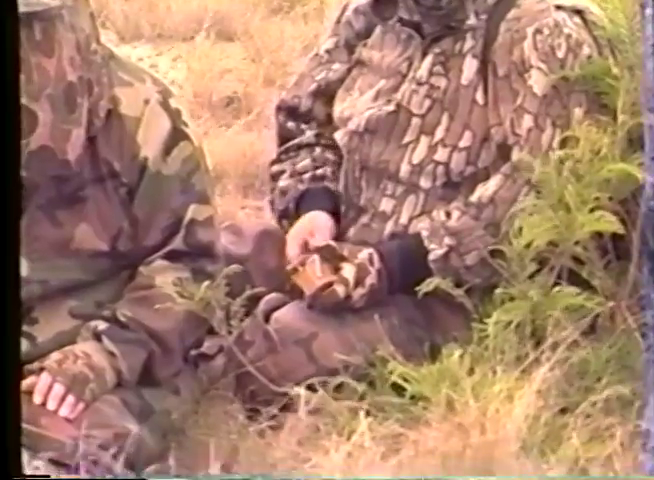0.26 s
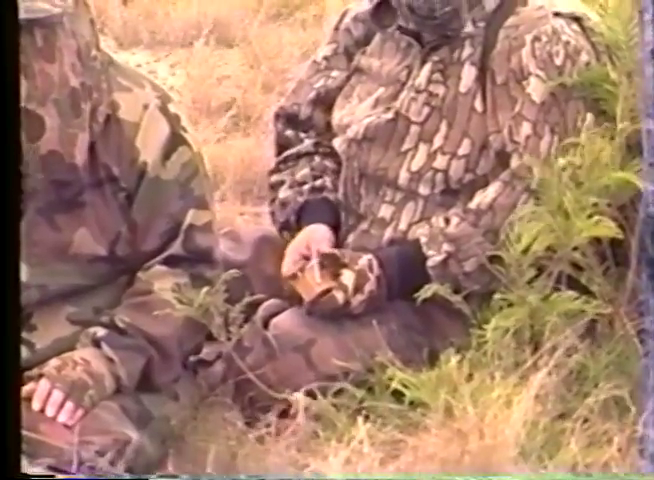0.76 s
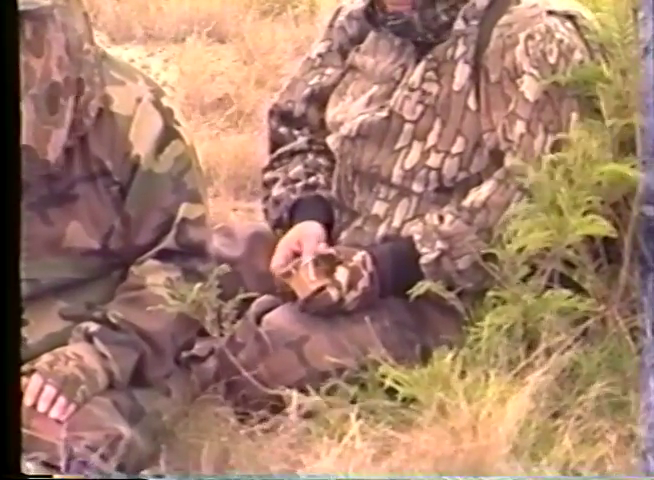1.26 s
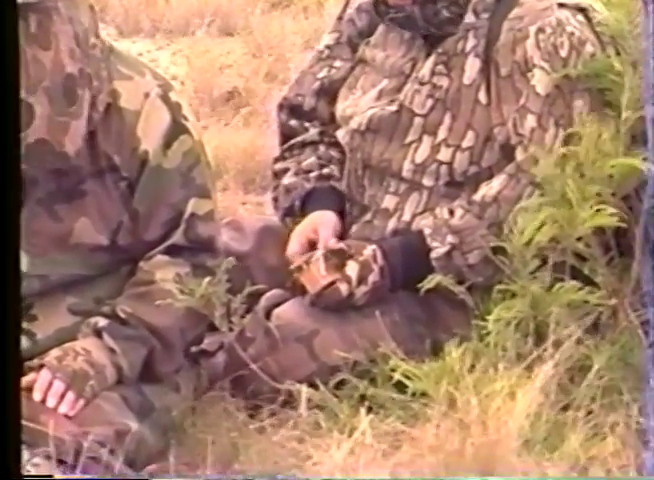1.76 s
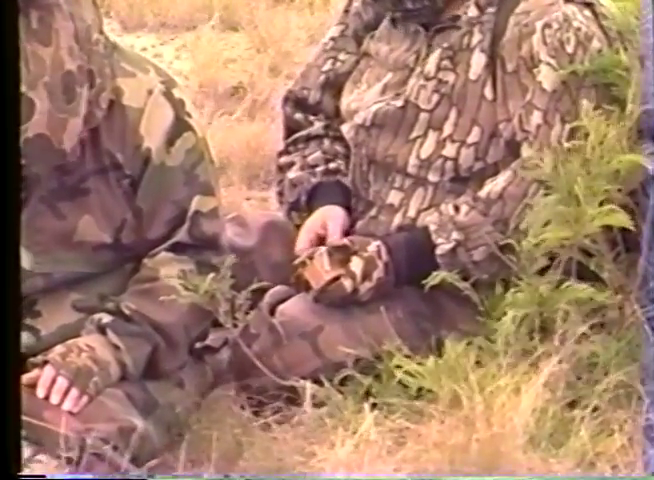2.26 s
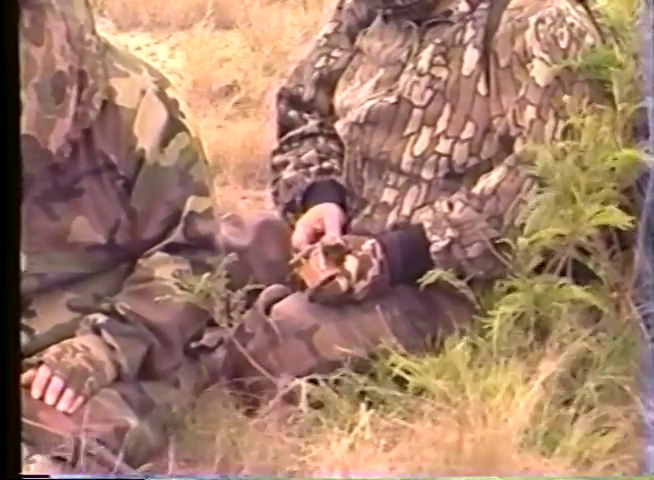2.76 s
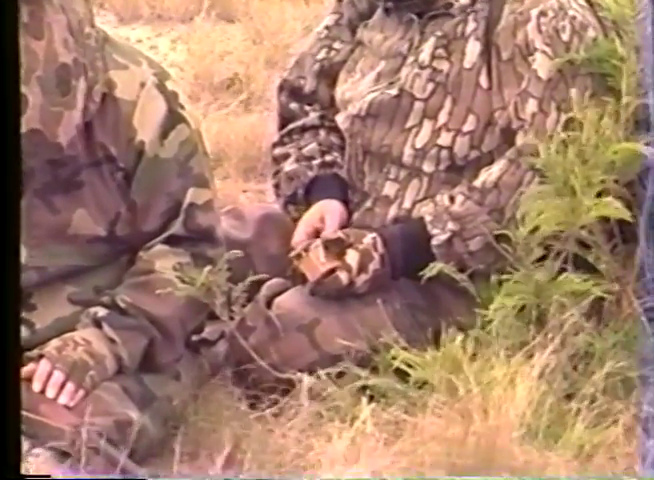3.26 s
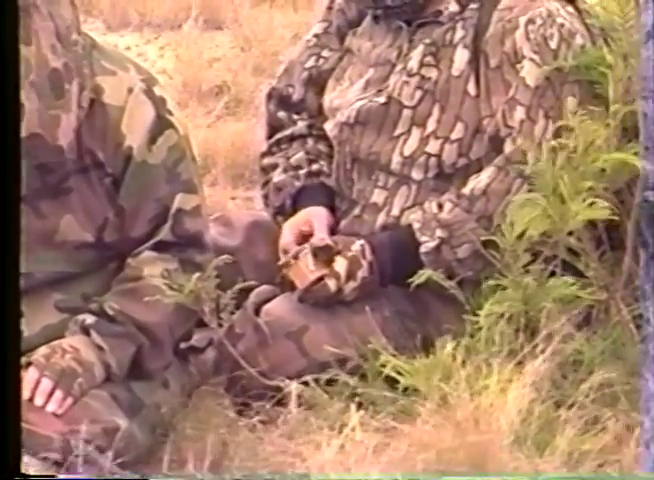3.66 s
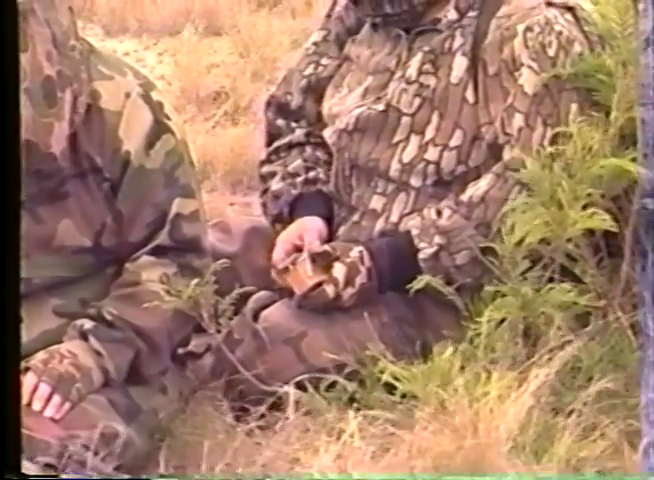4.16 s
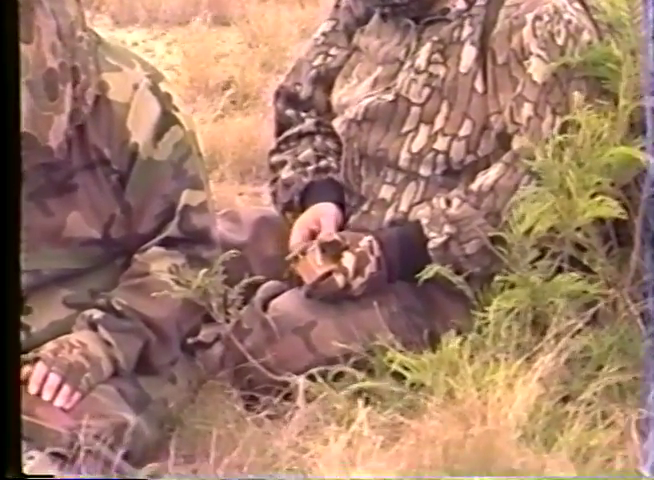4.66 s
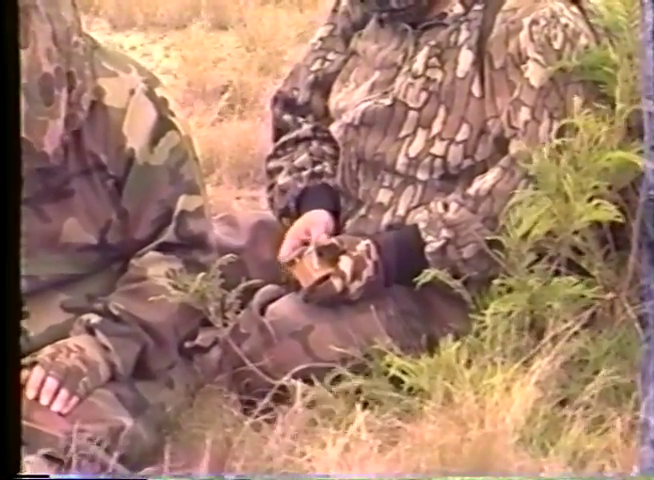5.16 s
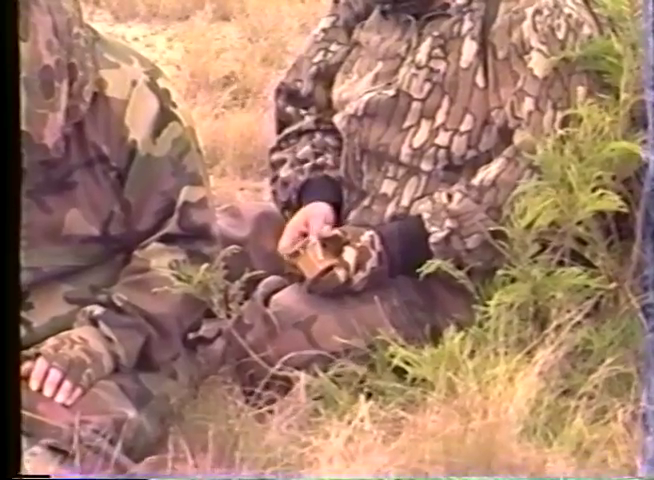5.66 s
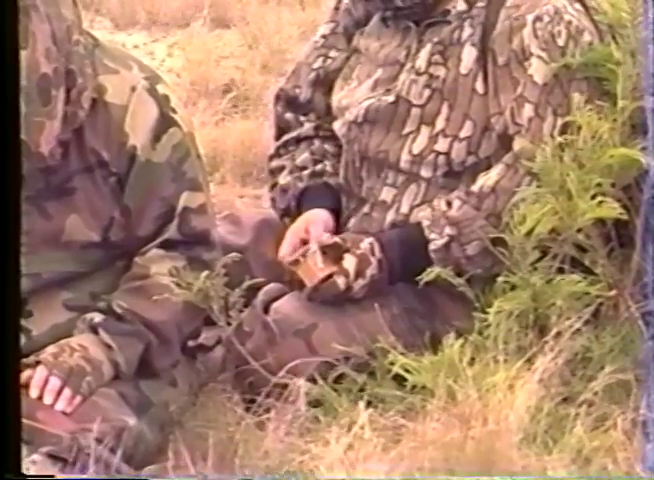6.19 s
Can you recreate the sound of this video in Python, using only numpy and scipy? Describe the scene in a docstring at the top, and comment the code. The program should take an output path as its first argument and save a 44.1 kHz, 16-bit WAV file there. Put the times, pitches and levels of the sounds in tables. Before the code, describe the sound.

A wooden turkey call squeaks out a quick series of scratchy yelps at close range, its lid rattling lightly between strokes. It pauses, gives two separate knocking clucks, then draws one slow, wavering squeal and starts a second run of yelps. Behind it is quiet outdoor air: soft wind in the grass and on the microphone, a faint steady hum and a few tiny, far-off bird chirps.

```python
"""Turkey box call in open grassland

Close to the microphone, a hand works a wooden box call: two runs of yelps with two clucks between.
The chalked lid sticks and slips on the box, falls in pitch, chatters as it leaves the edge and scuffs
on its way back. Small birds sing far off and a breeze buffets the microphone. The camcorder's gain
control ducks the breeze after each loud stroke, over a faint hum."""
import sys
import numpy as np
from scipy import signal
from scipy.fft import rfft, irfft
from scipy.io import wavfile
from scipy.ndimage import uniform_filter1d

SR = 44100
rng = np.random.default_rng(int(sys.argv[2]) if len(sys.argv) > 2 else 0)


def transcribe(u):
    """Save the signal u as a 16-bit wav file named by the first command-line argument.

    u: samples, shape (n,) or (channels, n), limited to [-1, 1]; the rate is SR.
    q: integer samples, one column per channel.
    """
    v = np.clip(np.atleast_2d(u).T, -1, 1)
    q = np.round(v * 32767).astype(np.int16)
    wavfile.write(sys.argv[1], SR, q)


N = 283559

# resonances of the box: (frequency [Hz], width [Hz], level [dB])
BOX = [(650.5, 65, -3.5), (878, 95, 3), (1379, 288, 3), (1517, 185, -1.5), (1851, 246, -4.5),
       (2163, 455, -4), (2544, 490, -21.5), (3670, 504, -12), (4020, 480, -3.5), (5680, 580, -13.5),
       (6220, 250, -17), (7253, 284, -17), (8620, 730, -22.5), (10600, 2500, -36)]
# resonances of the lid riding loose: (frequency [Hz], width [Hz], level [dB])
LID = [(1330, 300, -1.5), (2640, 780, -3), (3930, 600, -2.5), (5570, 320, 0.5), (6080, 300, 1.5),
       (7260, 200, -6), (8600, 1250, -2.5)]


def box_call(mix):
    """The lid is drawn over the edge stroke by stroke, and chatters each time it leaves."""
    # quick strokes, the two shortest being clucks: (start [s], length [s], level [dB], swell [s],
    # sag [dB], top pitch [Hz], time to top [s], glide [s], opening scratch [s], release [s],
    # chatter length [s], chatter level [dB])
    strokes = [(0.48, 0.11, -4, 0.011, 10, 874, 0.0079, 0.063, 0.0023, 0.029, 0.015, -21.5),
               (0.787, 0.086, -4.5, 0.012, 6.5, 827, 0.023, 0.031, 0.0025, 0.0054, 0.024, -10),
               (1.058, 0.087, -4.5, 0.016, 4, 827, 0.028, 0.034, 0.0054, 0.0071, 0.032, -9),
               (1.324, 0.08, -3, 0.024, 3.5, 824, 0.033, 0.031, 0.012, 0.0046, 0.025, -8),
               (1.615, 0.05, -5.5, 0.011, 4, 807.6, 0.011, 0.023, 0.0048, 0.0061, 0.036, -10.5),
               (1.872, 0.066, -5, 0.0055, 3, 820, 0.011, 0.033, 0.0042, 0.0021, 0.04, -9.5),
               (2.685, 0.017, 2.5, 0.00079, 2.5, 734, 0.0058, 0.0086, 0.0082, 0.0058, 0.024, -2),
               (3.4981, 0.017, -3, 0.0025, 0.5, 770, 0.0016, 0.012, 0.015, 0.0043, 0.014, -4),
               (4.607, 0.099, -7.5, 0.023, 3, 749, 0.0053, 0.063, 0.0048, 0.034, 0.043, -28.5),
               (4.894, 0.1, -8.5, 0.012, 2.5, 757, 0.0051, 0.055, 0.0034, 0.02, 0.028, -20.5),
               (5.179, 0.069, -6, 0.0066, 3, 810, .019, 0.032, 0.0083, 0.0087, 0.026, -12),
               (5.472, 0.059, -5, 0.0029, 3.5, 807, 0.015, 0.028, 0.0066, 0.0089, 0.028, -12),
               (5.726, 0.07, -5, 0.012, 2.5, 813.5, 0.022, 0.029, 0.0066, 0.0045, 0.03, -8.5),
               (6.001, 0.061, -5.5, 0.0045, 3.5, 768, 0.0032, 0.035, 0.0038, 0.0031, 0.02, -5.5),
               (6.261, 0.068, -6, 0.026, 5.5, 776, 0.021, 0.031, 0.012, 0.0046, 0.022, -9)]
    # chatter that ends the slow stroke: (time [s], length [s], level [dB])
    closing_chatter = (4.336, .04, -15.5)
    ring = wood_ring(BOX, -0.34, 480)
    for row in strokes:
        start, length, db, swell_s, sag_db, top_hz, top_s, glide_s = row[:8]
        bite_s, release_s, chatter_s, chatter_db = row[8:]
        gesture = quick_stroke(start, length, db, swell_s, sag_db, top_hz, top_s, glide_s, release_s)
        tilt_db = -2.17 * np.log2(glide_s / 0.03)  # slower glides are duller
        add(mix, start, yelp(*gesture, bite_s, tilt_db))
        add(mix, *chatter(start + length, chatter_s, chatter_db, ring))
    add(mix, *slow_stroke())
    add(mix, *chatter(*closing_chatter, ring))


def yelp(hz, force, bright_db, skid, bite_s, tilt_db, jitter=0.017, rasp_rad=0.32, chalk_db=-18.5):
    """Stick and slip on the edge; every cycle holds two unequal slips, so even partials lead."""
    n = len(hz)
    bite = np.exp(-(np.arange(n) / SR / bite_s) ** 2)
    turns = np.cumsum(hz * (1 + (jitter * np.sqrt(force) + 0.048 * bite) * wobble(n, 540))) / SR
    odd_db = -7 * (1 - force) - 7 * (hz / 880) ** 12  # soft or high, the two slips grow alike
    tone = 0
    for k in range(1, 21):
        octaves = np.log2(np.clip(k, 2, 10) / 2)
        flutter_db = 3 * np.sqrt(k / 6) * wobble(n, 100)
        waver = rasp_rad * octaves / 2 * wobble(n, 220)
        gain = amp(odd_db * (k % 2) + flutter_db + bright_db * octaves)
        tone = tone + gain * np.cos(2 * np.pi * k * turns + waver)
    # before it sings the lid catches with a dull, woody scratch
    scratch = noise(n, [(1600, 0), (7000, -15)])
    drive = unit(tone) * (1 - bite) + amp(1) * scratch * bite
    # chalk crunches in clumps and in step with the slips, more under a hard grip, less in a skid
    grit = rng.standard_normal(n) * (1 + 0.5 * np.cos(2 * np.pi * turns))
    grit = unit(grit * amp(6 * wobble(n, 260)))
    grit *= amp(chalk_db + tilt_db + 6 * skid) * force ** 0.88 * hz / 700
    sound = signal.fftconvolve(drive, wood_ring(BOX, tilt_db, 692, notch_db=-8.5))
    sound += signal.fftconvolve(grit, wood_ring(BOX, tilt_db))
    # the hand's push shakes the whole box faintly, most as the lid bites
    shake = noise(n, [(60, 2.5), (200, -7.5), (550, -16.5), (3000, -64)])
    push = amp(-27) * (0.86 + 3 * bite) * shake
    return (steady(sound[:n]) + push) * force


def quick_stroke(start, length, db, swell_s, sag_db, top_hz, top_s, glide_s, release_s, low_hz=640.6):
    """Pitch arches and falls toward the low note while the hand's pressure swells and sags."""
    age = np.arange(int((length + release_s) * SR)) / SR
    hz = low_hz + (top_hz - low_hz) * np.exp(-abs((age - top_s) / glide_s) ** 2.454)
    press_db = -31 * np.clip(1 - age / swell_s, 0, 1) ** 2 - sag_db * (age / length) ** 3.8
    bright_db = -1.28 + 0.46 * press_db  # per octave; a lighter hand is duller
    return grip(start + age, hz, db + press_db, bright_db, release_s)


def slow_stroke():
    """The long whine that opens the second run: the hand feels for the grip, then leans in."""
    # course of the stroke: (time [s], pitch [Hz], level [dB], brightness [dB/octave])
    whine = [(4.047, 739, -31, -2), (4.083, 737, -26, -7), (4.115, 784, -23, -0.5), (4.165, 803.5, -22, 2),
             (4.208, 777, -21.5, -0.5), (4.248, 737, -10, -3.5), (4.28, 734, -11, -2),
             (4.33, 658.6, -10, -5), (4.381, 643, -21, -15)]
    times, *curves = np.transpose(whine)
    t = np.arange(times[0], times[-1], 1 / SR)
    hz, db, bright_db = (np.interp(t, times, curve) for curve in curves)
    gesture = grip(t, hz, db, bright_db, release_s=0.06)
    return times[0], yelp(*gesture, bite_s=0.0024, tilt_db=-4)


def grip(t, hz, db, bright_db, release_s, lift_hz_per_db=2):
    """The lid takes hold, skids and lets go. Gives pitch, force, brightness and skidding (0 to -1, lowest in a
    skid)."""
    # brief losses of grip: (time [s], half width [s], loss [dB], bend scale [Hz])
    # a positive bend climbs into the skid and restarts low; a negative one drags, then leaps
    skids = [(0.503, 0.0084, 1.5, 47), (0.523, 0.012, 5, -1.5), (0.811, 0.0032, 7.5, -11),
             (1.333, 0.0039, 13.5, 18), (1.362, 0.0049, 5.5, -17), (4.1263, 0.0075, 14.5, 61),
             (4.142, 0.0032, 16, 51), (4.16, 0.0067, 6.5, 32), (5.186, 0.0039, 5.5, 15.5),
             (5.207, 0.0065, 4, -55), (5.492, 0.0095, 7.5, -53), (5.757, 0.0047, 3.5, -52),
             (6.27, 0.0023, 11, 34)]
    near = [((t - s) / width, loss, bend) for s, width, loss, bend in skids]
    loss_db = sum(loss * np.exp(-u ** 2) for u, loss, _ in near)
    bend_hz = sum(bend * -u * np.exp(-u ** 2) for u, _, bend in near)
    skid = np.tanh(loss_db / -3.5)
    fade = np.clip(np.minimum((t - t[0]) / 0.0032, (t[-1] - t) / release_s), 0, 1)
    pitch = hz + lift_hz_per_db * loss_db + bend_hz
    return pitch, amp(db - loss_db) * fade, bright_db + 1.5 * skid, skid


def chatter(s, length, db, ring, slip_hz=440, ring_s=0.0059):
    """Loose, uneven slips die away and shake a few modes of the box, which ring on roughly."""
    # modes that sound on through the chatter: (frequency [Hz], level [dB])
    walls = [(900, -3), (1230, -16), (2150, -16.5)]
    n = int((length + 0.056) * SR)
    t = np.arange(n) / SR
    press = np.clip(t / 0.00073, 0, 1) * np.clip(1 - t / length, 0, 1) ** 1.5
    turns = np.cumsum(slip_hz * (1 + 0.31 * wobble(n, 400))) / SR
    slips = np.diff(np.floor(turns), prepend=0) + amp(-19) * rng.standard_normal(n)
    rasp = signal.fftconvolve(slips * press, ring)[:n]
    sound = amp(-12) * rasp / np.std(rasp[:int(length * SR)])
    swell = np.clip(t / 0.0051, 0, 1) / np.sqrt(1 + np.exp(2 * (t - 0.66 * length) / ring_s))
    for hz, level in walls:
        shaken = amp(1.5 * wobble(n, 300)) * sine(hz + 55 * wobble(n, 130))
        sound += amp(level) * swell * shaken
    return s, amp(db) * sound


def cluck_jabs(mix, rise_s=0.0024, crunch_s=0.005):
    """A jab starts each cluck: the whole box knocks in the hand while chalk crunches under the lid."""
    # jabs on the lid: (time [s], level [dB])
    jabs = [(2.6855, -5.5), (3.5004, -11)]
    # modes of the box in the hand: (frequency [Hz], level [dB], time to fall 60 dB [s])
    knock_modes = [(63.3, -4, 0.108), (236, -12, 0.051), (425, -7.5, 0.034), (740, 9.5, 0.036)]
    # band where the chalk crunches most: (frequency [Hz], width [Hz], level [dB])
    crunch_band = (2900, 990, 0)
    ring = wood_ring(BOX + LID + [crunch_band], 0.55)
    t = np.arange(SR // 8) / SR
    knock = sum(amp(db - 60 * t / t60) * np.sin(2 * np.pi * hz * t) for hz, db, t60 in knock_modes)
    knock *= np.clip(t / rise_s, 0, 1)
    for s, db in jabs:
        grains = unit(signal.fftconvolve(rng.standard_normal(len(t)), ring)[:len(t)])
        crunch = grains * t / crunch_s * np.exp(1 - t / crunch_s)
        add(mix, s, amp(db) * (knock + amp(4) * crunch))


def loose_lid(mix):
    """Small handling sounds, heard at close range: the lid rattles, scuffs back and taps the box."""
    # one rattle after the first run: (time [s], length [s], level [dB])
    rattle = (2.013, 0.011, -27)
    # return swings of the lid: (time [s], length [s], level [dB])
    scuffs = [(0.211, 0.033, -39), (0.963, 0.016, -38), (1.507, 0.064, -29.5), (2.055, 0.046, -36),
              (2.23, 0.022, -41.5), (4.749, 0.054, -43.5), (5.05, 0.026, -39.5)]
    # the lid meets the box: (time [s], peak level [dB])
    taps = [(0.43, -25), (0.7648, -23), (1.9724, -20), (2.232, -22), (3.042, -31), (6.099, -21.5)]
    # a finger ticks on the lid before the first cluck: (time [s], peak level [dB])
    finger_tick = (2.6428, -28)
    box_ring, lid_ring = wood_ring(BOX, -7, 400), wood_ring(LID, 0.1, 530)
    add(mix, *chatter(*rattle, box_ring))
    for row in scuffs:
        add(mix, *scuff(*row, lid_ring))
    for row in taps:
        add(mix, *tap(*row, box_ring))
    add(mix, *tap(*finger_tick, wood_ring(LID, -2)))


def scuff(s, length, db, ring, first_hz=1520, last_hz=1290, catch_hz=125):
    """The unloaded lid drags chalk grains and half catches a hoarse, falling squeak in quick jerks."""
    n = int(length * SR)
    along = np.linspace(0, 1, n)
    catches = np.cumsum(catch_hz * (1 + 0.41 * wobble(n, 88))) / SR
    jerks = 1 + 0.36 * np.cos(2 * np.pi * catches)
    friction = rng.standard_normal(n) * amp(3 * wobble(n, 1300)) * np.sqrt(jerks)
    grains = signal.fftconvolve(friction, ring)[:n]
    pitch = (first_hz + (last_hz - first_hz) * along) * (1 + 0.036 * wobble(n, 430))
    squeak = sine(pitch) * jerks * amp(4.1 * wobble(n, 320))
    envelope = np.clip(along * length / 0.0019, 0, 1) * (1 - along ** 1.7)
    return s, amp(db) * unit((amp(-4) * unit(grains) + unit(squeak)) * envelope)


def tap(s, db, ring, damp_s=0.0045, contact_s=0.00008, bounce_s=0.0032):
    """One soft knock on wood with a small bounce, damped by the hand."""
    t = np.arange(len(ring)) / SR
    knock = signal.fftconvolve(ring * np.exp(-t / damp_s), t * np.exp(-t / contact_s))
    add(knock, bounce_s, amp(-5) * knock)
    return s, amp(db) * knock / abs(knock).max()


def wood_ring(modes, tilt_db=0, low_hz=600, notch_db=0, size=4096):
    """The wood's answer to one slip, its treble tilted by tilt_db an octave."""
    hz = abs(np.fft.fftfreq(size, 1 / SR)) + 1
    gain = sum(amp(db) / (1 + (2 * (hz - centre) / width) ** 2) for centre, width, db in modes)
    gain *= amp(notch_db * np.exp(-((hz - 2850) / 210) ** 2))  # cut by the way the lid touches
    gain *= amp(tilt_db * np.log2(np.maximum(hz / 1300, 1)))
    gain /= 1 + (low_hz / hz) ** 4  # so small a box radiates little bass
    minimum_phase = np.exp(np.conj(signal.hilbert(np.log(gain + 1e-4))))
    return np.fft.ifft(minimum_phase).real[:size // 2]


def far_birds(mix, scatter_s=0.013):
    """Thin, warbling glides, blurred by their way through the brush to the microphone."""
    # bird notes: (time [s], length [s], first pitch [Hz], last pitch [Hz])
    notes = [(1.272, 0.042, 2980, 4360), (3.297, 0.063, 2100, 2350), (4.419, 0.028, 8030, 8200),
             (4.819, 0.074, 3060, 2520), (4.844, 0.026, 7500, 8130), (5.086, 0.1, 3210, 2480),
             (5.314, 0.031, 8660, 7500), (5.383, 0.1, 2895, 2590), (5.427, 0.044, 8700, 7620),
             (5.692, 0.076, 3140, 2840), (5.915, 0.046, 6800, 5900), (6.168, 0.052, 6740, 5650)]
    for s, length, first_hz, last_hz in notes:
        n = int(length * SR)
        hz = np.geomspace(first_hz, last_hz, n) * (1 + 0.007 * wobble(n, 300))
        call = unit(sine(hz) * signal.windows.tukey(n, 0.7))
        path = rng.standard_normal(SR // 10) * np.exp(-np.arange(SR // 10) / SR / scatter_s)
        path *= amp(-6) / np.linalg.norm(path)
        path[0] = 1  # the direct sound
        db = -59 + 3.5 * np.log2(first_hz / 1000)  # higher calls are louder
        add(mix, s, amp(db) * signal.fftconvolve(call, path) / np.linalg.norm(path))


def breeze(split_hz=700):
    """Hiss in the grass, over a rumble and a buffeting of the microphone that rise with the gusts."""
    # spectrum of the breeze in the grass: (frequency [Hz], level [dB])
    spectrum = [(20, -34), (40, -14.5), (59, -10), (166, -14), (289, -11.5), (352, -15.5), (1010, -17.5),
                (1300, -22), (1670, -28), (2150, -23.5), (3850, -28.5), (8880, -26.5), (15500, -35.5)]
    # gusts in the rumble: (time [s], level [dB])
    gusts = [(0, 5.5), (1.9, -4), (2.451, 6), (2.85, 2.5), (3.297, 5), (4.0, 3), (4.6, -1), (6.401, -5)]
    air = amp(-51.5) * noise(N, spectrum)
    rumble = signal.sosfiltfilt(signal.butter(2, split_hz, fs=SR, output="sos"), air)
    gust = amp(np.interp(np.arange(N) / SR, *np.transpose(gusts)) + 2 * wobble(N, 5.5))
    buffet = amp(-58) * noise(N, [(15, -9.5), (30, -11.5), (65, 0.5), (120, -14), (600, -37)])
    hiss = (air - rumble) * amp(1.5 * wobble(N, 8.8))
    return rumble * gust + buffet * gust ** 2 + hiss


def gain_control(x, knee_db=-20, hold_s=0.1, recover_s=0.044, start_db=9, hop=32):
    """Gain that drops at once on a loud sound, holds, then creeps back; it starts out lowered."""
    level_db = 10 * np.log10(abs(uniform_filter1d(x ** 2, size=130)) + 1e-12)[::hop]
    t = np.arange(N)[::hop] / SR
    cut_db = 0.87 * np.maximum(level_db - knee_db, 0)
    memory = np.exp(-np.maximum(t[t < 1] - hold_s, 0) / recover_s)
    held_db = start_db * np.exp(-t / (2 * recover_s))
    for lag, weight in enumerate(memory):
        held_db[lag:] = np.maximum(held_db[lag:], weight * cut_db[:len(t) - lag])
    return amp(-np.interp(np.arange(N) / SR, t, held_db))


def amp(db):
    """Decibels to gain."""
    return 10 ** (np.asarray(db) / 20)


def unit(x):
    """Scales to rms 1."""
    return x / np.sqrt(np.mean(x ** 2) + 1e-20)


def add(mix, s, sound):
    """Mixes a sound in at time s."""
    part = mix[max(round(s * SR), 0):][:len(sound)]
    part += sound[:len(part)]


def sine(hz):
    """A sine that follows a pitch curve."""
    return np.sin(2 * np.pi * np.cumsum(hz) / SR)


def noise(n, points):
    """Noise of rms 1 with a spectrum of (frequency [Hz], level [dB]) points."""
    hz, db = np.transpose(points)
    shape = np.interp(np.log(np.fft.rfftfreq(n, 1 / SR) + 1), np.log(hz + 1), db)
    return unit(irfft(rfft(rng.standard_normal(n)) * amp(shape), n))


def wobble(n, hz):
    """Smooth random drift of rms about 1, rolling off above hz."""
    size = n + SR // 4
    lowpass = np.exp(-(np.fft.rfftfreq(size, 1 / SR) / hz) ** 2)
    return unit(irfft(rfft(rng.standard_normal(size)) * lowpass, size))[:n]


def steady(x, size=130):
    """Evens out the level over a few cycles."""
    return x / np.sqrt(abs(uniform_filter1d(uniform_filter1d(x ** 2, size), size)) + 1e-12)


def scene():
    """The box call close by, birds and breeze beyond; all near centre, the left a touch louder."""
    mix = breeze()
    box_call(mix)
    cluck_jabs(mix)
    loose_lid(mix)
    far_birds(mix)
    return mix * amp([[0.22], [-0.22]])


def record(dry, ceiling=0.36, edge_hz=16000):
    """Gain control and soft overload, then the camcorder's own hum, hiss and band limit."""
    # camcorder hum and line whistle: (frequency [Hz], level [dB])
    hum_tones = [(29.97, -63), (59.94, -54.5), (89.9, -62), (119.9, -68), (149.8, -66.5), (179.8, -69),
                 (239.8, -70), (15734, -73)]
    t = np.arange(N) / SR
    hum = sum(amp(db) * np.sqrt(2) * np.sin(2 * np.pi * (hz * t + rng.random())) for hz, db in hum_tones)
    hiss = np.array([amp(-65) * noise(N, [(25, 0), (500, -21), (2000, -32)]) for _ in dry])
    limited = ceiling * np.tanh(dry * gain_control(dry.mean(0)) / ceiling)
    out = limited + hum * amp(0.44 * wobble(N, 4.7)) + hiss
    lowpass = signal.firwin(511, edge_hz, window=("kaiser", 9), fs=SR)
    return signal.oaconvolve(out, lowpass[None], "same")


dry = scene()
out = record(dry)
transcribe(out)
```